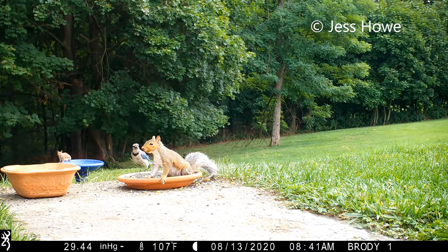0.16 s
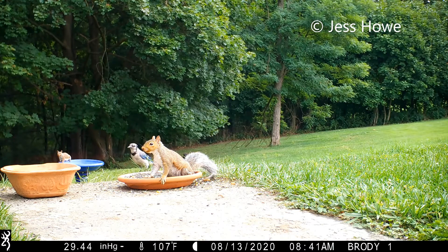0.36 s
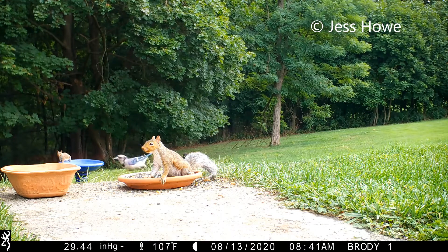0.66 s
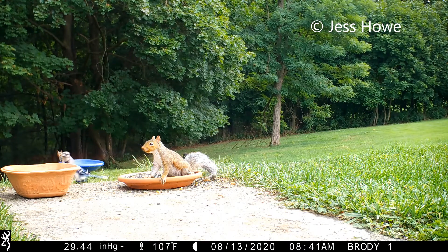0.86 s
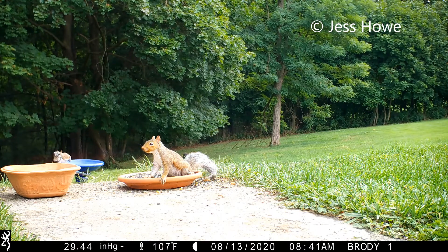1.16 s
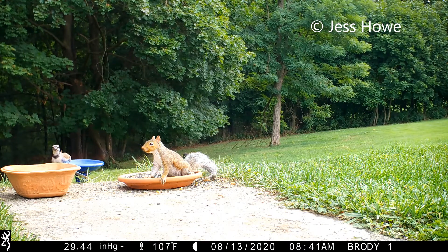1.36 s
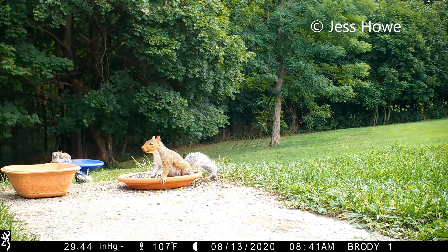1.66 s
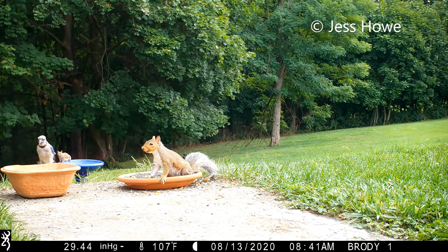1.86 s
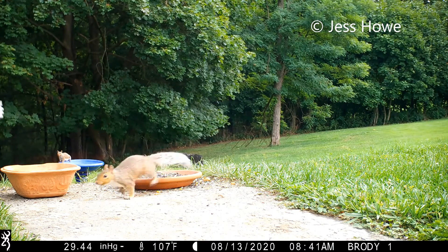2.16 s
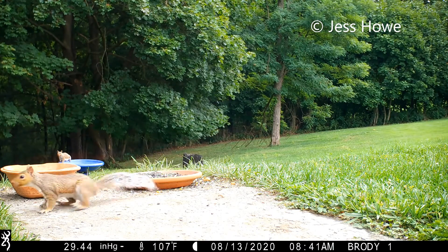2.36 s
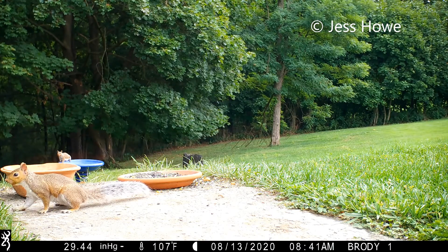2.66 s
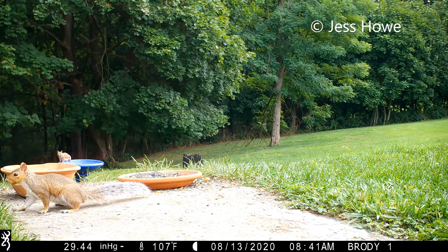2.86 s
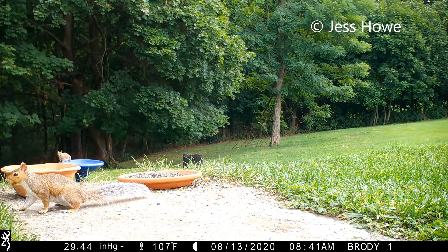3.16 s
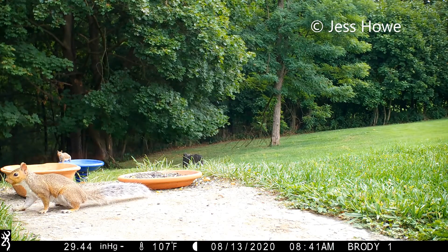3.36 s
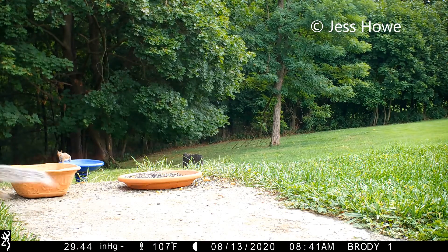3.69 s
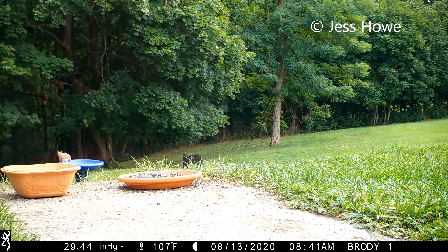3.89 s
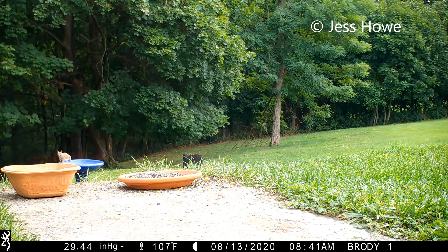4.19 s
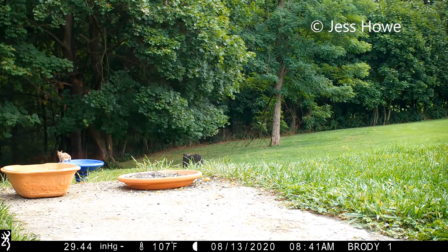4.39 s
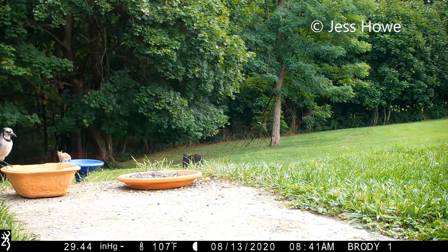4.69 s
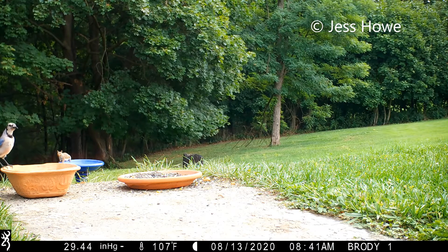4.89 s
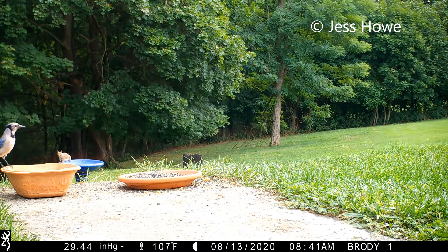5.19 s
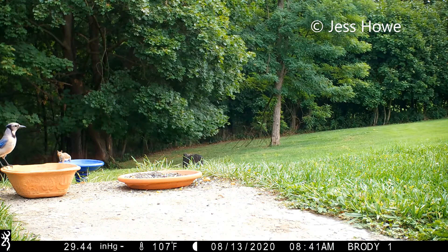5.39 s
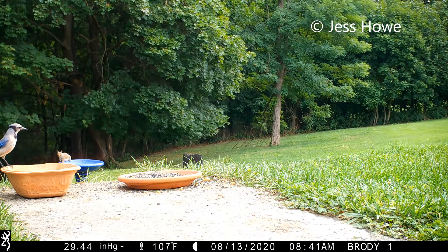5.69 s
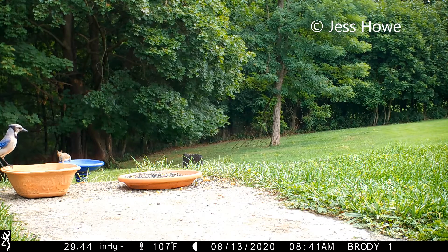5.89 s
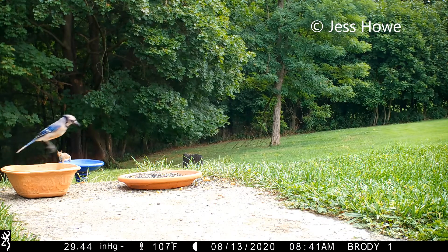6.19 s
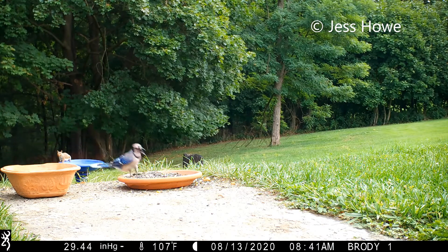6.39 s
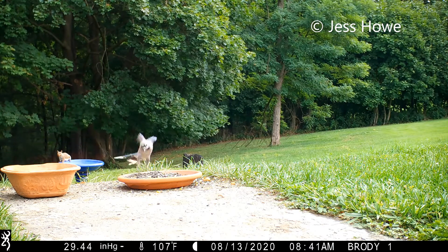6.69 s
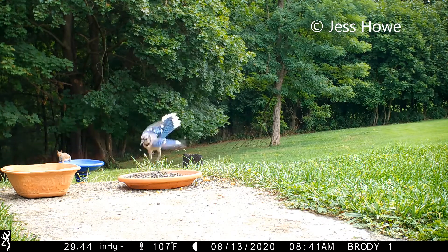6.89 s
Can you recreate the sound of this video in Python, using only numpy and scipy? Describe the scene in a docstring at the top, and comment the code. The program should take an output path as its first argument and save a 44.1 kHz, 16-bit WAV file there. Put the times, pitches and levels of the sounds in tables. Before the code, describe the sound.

A quiet garden beside woods, heard through a cheap camera microphone with a very faint high whine. The tail of a loud jay scream opens, then wingbeats, light paw scuffs and a tiny squeak. Two more piercing, raspy screams come about three seconds apart, crackling with overload and echoing off the trees. Far-off sweet descending whistles continue between them, and slight wing rustles surround the last call.

```python
"""In a garden, by a feeding dish, a blue jay gives three loud jeers close to a trail camera.
Each jeer is a harmonic stack that scoops up to a crest, sags, flutters fast and plunges; sparse decaying
echoes from the edge of the wood follow. Far off a small bird repeats a falling four-note song of sliding sines.
Wings and paws rustle as shaped noise over a soft hush, and the camera whines as a phase-flipping tone.
Its microphone overloads: peaks are rounded, with crackle, buzz and a shrill third harmonic."""
import sys
import numpy as np
from scipy import signal
from scipy.fft import rfft, irfft, next_fast_len
from scipy.io import wavfile
from scipy.ndimage import uniform_filter1d

SR = 44100
rng = np.random.default_rng(int(sys.argv[2]) if len(sys.argv) > 2 else 0)


def wav_out(sig):
    """Save sig, one row per channel (or a flat mono array), as 16-bit PCM at SR to the path in sys.argv[1]."""
    wavfile.write(sys.argv[1], SR, np.round(np.clip(np.atleast_2d(sig).T, -1, 1) * 32767).astype(np.int16))


N = 310904
T = np.arange(-SR // 4, N) / SR  # seconds; the first jeer is already under way at time zero


def undb(db):
    """Decibels to gain."""
    return 10 ** (np.asarray(db) / 20)


def unit(x):
    """Scale to rms 1."""
    return x / np.sqrt(np.mean(x ** 2))


def walk(rate_hz):
    """Random levels, each held for 1 / rate_hz, smoothed by two moving averages; rms 1."""
    hold = max(int(SR / rate_hz), 1)
    levels = rng.standard_normal(len(T))[:len(T) // hold + 1]
    held = np.repeat(levels, hold)
    slewed = uniform_filter1d(uniform_filter1d(held, hold), hold)
    return unit(slewed[:len(T)])


def tint(x, colour):
    """Filter with a response of (Hz, dB) points, joined on a log frequency axis."""
    hz, db = np.transpose(colour)
    size = next_fast_len(len(x))
    bins_hz = np.maximum(np.fft.rfftfreq(size, 1 / SR), 1)
    gain = undb(np.interp(np.log(bins_hz), np.log(hz), db))
    return irfft(rfft(x, size) * gain, size)[:len(x)]


def noise(colour):
    """Noise of rms 1 with a given colour."""
    return unit(tint(rng.standard_normal(len(T)), colour))


def swell(centre_s, length_s):
    """Gaussian rise and fall, length_s wide between its 1/e points."""
    return np.exp(-np.minimum((2 * (T - centre_s) / length_s) ** 2, 50))


def garden(hush_db=-51, rumble_db=-78):
    """Distant outdoor hush with a slowly shifting rumble, both coloured noise."""
    # Each row: frequency in Hz, relative density in dB.
    hush_colour = [(25, -26.5), (61, -10), (140, -3), (300, -1.5), (550, -4), (950, -3.5), (1680, -8),
                   (3000, -17), (4000, -26), (5000, -32), (7000, -35), (9000, -48), (11000, -47.5),
                   (15500, -48.5)]
    rumble_colour = [(60, -20), (140, -1.0), (290, 7.0), (500, -16), (1200, -29)]
    hush = noise(hush_colour) * undb(hush_db + 0.9 * walk(8.5))
    rumble = noise(rumble_colour) * undb(rumble_db + 0.73 * walk(0.86))
    return hush + rumble


def whine(tone_hz=7797, level_db=-75):
    """The camera's electronics: a thin tone that flips phase sixty times a second."""
    flips = np.pi / 2 * np.tanh(6 * np.sin(2 * np.pi * 30 * T))
    return np.sqrt(2) * undb(level_db) * np.sin(2 * np.pi * tone_hz * T + flips)


def lone_crackle(centre_s=3.42, length_s=0.015, level_db=-40.5):
    """One lone low crackle of the overloaded microphone: a short swell of dark noise."""
    colour = [(30, 5.0), (120, 0.5), (300, -22), (1000, -23), (8000, -39.0)]
    return undb(level_db) * swell(centre_s, length_s) * noise(colour)


def bursts(table, colour, grain_db):
    """Brief swishes of noise whose level jitters into grains."""
    swells = sum(undb(db) * swell(s, length_s) for s, length_s, db in table)
    return noise(colour) * undb(grain_db * walk(570)) * swells


def flurry(depth=0.23, grain_db=3):
    """Low puffs of air, one to each wing beat, that swell and die away."""
    # Each row: frequency in Hz, relative density in dB.
    puff_colour = [(40, -36.5), (150, -12), (290, 5.5), (420, -11), (700, -42), (8000, -75)]
    centre_s, length_s, level_db, wingbeat_hz = 1.675, 0.31, -48, 17.2
    beats = 1 - depth + depth * np.cos(2 * np.pi * wingbeat_hz * (T - centre_s))
    puffs = noise(puff_colour) * undb(level_db + grain_db * walk(400))
    return puffs * beats * swell(centre_s, length_s)


def movement(squeak_s=2.128):
    """Wings and paws around the dish as noise bursts, and a tiny sine squeak."""
    # Wing beats and scampering paws. Each row: centre in seconds, length in seconds, level in dB before grain.
    rustles = [(2.034, 0.035, -44.5), (2.103, 0.036, -53), (2.135, 0.082, -51.5), (2.231, 0.02, -52.5),
               (2.33, 0.049, -55.5), (2.42, .07, -58), (6.19, 0.028, -54), (6.88, .03, -58),
               (7.005, 0.054, -48)]
    # Each row: frequency in Hz, relative density in dB.
    rustle_colour = [(200, 3), (600, 0.5), (1500, 4.5), (2000, 4.5), (2300, 11.5), (2600, 4), (3000, 3.5),
                     (3450, -5), (3850, -1.5), (4600, -15.5), (9000, -31), (15000, -40)]
    squeak = undb(-62) * swell(squeak_s, 0.037) * np.sin(2 * np.pi * 4150 * T)
    return bursts(rustles, rustle_colour, grain_db=3.0) + flurry() + squeak


def woods(x, t60_s, first_s):
    """Sparse decaying echoes from trunks and leaves, convolved with the sound."""
    # Each row: frequency in Hz, gain in dB.
    echo_colour = [(500, -7.5), (1600, -3.5), (2600, -0.5), (3300, -1), (4200, 5), (5500, -5), (6600, 3),
                   (7600, -2), (9000, -3.5), (12000, -11.5)]
    t = np.arange(SR) / SR
    decay = np.exp(-np.log(1000) * t / t60_s)
    echoes = rng.standard_normal(SR) ** 3 * decay * (t > first_s)  # cubing makes strong echoes rare
    response = tint(echoes / np.linalg.norm(echoes), echo_colour)
    return signal.fftconvolve(x, response)[:len(x)]


def whistlers(waver=0.0061, direct_db=2, echo_db=4):
    """Pure notes that slide and settle, blurred by the trees."""
    # Two falling pairs of notes, high then low. Each row: delay in seconds and length in seconds
    # (both before stretch), fall as a share of the pitch, relative level in dB.
    song = [(0, .17, .085, -64.5), (0.142, .11, .06, -68.5), (0.202, 0.145, 0.0356, -58.5),
            (0.361, 0.114, 0.023, -55)]
    # Each row: start in seconds, time stretch, first pitch of the high pair in Hz, of the low pair in Hz,
    # added level of the high pair in dB, of the low pair in dB.
    phrases = [(0, 0.98, 3750, 2760, -4, 2.5), (.35, 1.06, 3737, 2623, -1, -2),
               (.98, 0.83, 3726, 2820, -3.5, -2), (3.56, 0.85, 3480, 2690, 2, -0.5),
               (3.955, 1.1, 3260, 2840, 2.5, -15), (5.557, .98, 3737, 2760, -1, 1),
               (5.981, 1.04, 3820, 2723, -5, 1.5)]
    # Single notes outside the phrase pattern, among them the last low note of the 3.955 s phrase.
    # Each row: start in seconds, length in seconds, final pitch in Hz,
    # fall as a share of the pitch (negative rises), relative level in dB.
    single_notes = [(0.451, .17, 1482, -0.16, -57.5), (1.16, .08, 1690, 0.021, -62),
                    (1.401, .073, 2156, 0.063, -56.5), (2.63, 0.046, 1690, 0.012, -59.5),
                    (4.34, 0.036, 2236, -0.023, -55), (6.211, 0.15, 3770, 0.055, -67.5)]
    high_step, low_step = 1.14, 1.28  # pitch ratio within each pair
    notes = list(single_notes)
    for s, stretch, high_hz, low_hz, high_db, low_db in phrases:
        tune = [(high_hz, high_db), (high_hz / high_step, high_db),
                (low_hz, low_db), (low_hz / low_step, low_db)]
        for (hz, pair_db), (delay_s, length_s, fall, note_db) in zip(tune, song):
            notes.append((s + stretch * delay_s, stretch * length_s, hz, fall, pair_db + note_db))
    out, drift = np.zeros_like(T), 1 + waver * walk(120)
    for s, length_s, end_hz, fall, db in notes:
        on = (T >= s) & (T < s + length_s)
        u = (T[on] - s) / length_s
        hz = end_hz * (1 + fall * (1 - u) ** 1.5) * drift[on]
        tone = np.sin(2 * np.pi * np.cumsum(hz) / SR)
        out[on] += np.sqrt(2) * undb(db) * np.sqrt(np.sin(np.pi * u)) * tone
    return undb(direct_db) * out + undb(echo_db) * woods(out, t60_s=0.89, first_s=0.0062)


def pops(lower_hz=2050, upper_hz=4900, upper_db=-14, length_s=0.0014):
    """The syrinx pops once before the later two jeers: two throat tones under a very short swell."""
    # Each row: centre in seconds, level of the lower tone in dB.
    pop_rows = [(3.226, -24), (6.426, -17)]
    ring = np.sin(2 * np.pi * lower_hz * T) + undb(upper_db) * np.sin(2 * np.pi * upper_hz * T)
    return ring * sum(undb(db) * swell(s, length_s) for s, db in pop_rows)


def gesture(t, start_s, end_s, others_db, held):
    """The course of one jeer: pitch, level of the favoured harmonic and of the others, flutter depth."""
    scoop_depth, scoop_s, plunge_depth, plunge_s = .39, .0115, .22, .0055  # depths are shares of the pitch
    # the favoured harmonic starts less far down than the rest, which catch up a little later;
    # all fade in the plunge
    swell_db, swell_s, onset_db, onset_s = -6.5, .016, -14, .011
    release_db, release_s = -17.5, 0.0036
    flutter_s = 0.12  # time constant of the flutter's build-up towards the end
    since, left = np.maximum(t - start_s, 0), np.maximum(end_s - t, 0)
    s, *columns = np.transpose(held)
    hz, db = (np.interp(t, s, column) for column in columns)
    scoop = scoop_depth * np.exp(-(since / scoop_s) ** 2)
    plunge = plunge_depth * np.exp(-left / plunge_s)
    release = release_db * np.exp(-left / release_s)
    favoured_db = db + swell_db * np.exp(-(since / swell_s) ** 2) + release
    lesser_db = others_db + onset_db * np.exp(-since / onset_s) + release
    return hz * (1 - scoop - plunge), favoured_db, lesser_db, np.exp(-left / flutter_s)


def jeer(row, held, harmonics, bend=.021, quaver_db=0.15, waver_db=2.5, jitter=0.0032,
         edge_s=0.0025, attack_s=0.018, attack_db=-12, throat_pitch_hz=825):
    """A harmonic stack; the second side of the syrinx shakes its pitch and loudness."""
    # Each row: frequency in Hz, relative density in dB.
    rasp_colour = [(800, -35.5), (2100, 8), (3000, -2), (4200, 3.5), (5200, -4.5), (6600, -6), (7500, -23),
                   (10000, -22.5), (15000, -37.5)]
    start_s, end_s, others_db, flutter_hz, throb, rough, rasp_db, squeal_db = row
    on = (T > start_s - edge_s) & (T < end_s + edge_s)
    t = T[on]
    hz, db, lesser_db, flutter = gesture(t, start_s, end_s, others_db, held)

    shake = 2 * np.pi * np.cumsum(flutter_hz * (1 + 0.053 * walk(90)[on])) / SR
    roughness = (jitter + rough * flutter ** 2) * walk(900)[on]
    wobble = bend * flutter * np.sin(shake) + roughness
    phase = 2 * np.pi * np.cumsum(hz * (1 + wobble)) / SR

    # brassiness sets every harmonic but the favoured one, and each of them wavers on its own
    numbers, levels = np.transpose(harmonics)
    strongest, favoured = max(levels), np.argmax(levels) + 1
    brass_db = lesser_db - db
    # at the crest the upper harmonics climb out of the throat's resonance
    climb = np.maximum(hz / throat_pitch_hz, 1)
    voice = np.zeros_like(t)
    for k, level in enumerate(levels, 1):
        harmonic_db = np.interp(k * climb if k > favoured else k, numbers, levels)
        if level < strongest:
            harmonic_db = harmonic_db + brass_db + waver_db * walk(35)[on]
        voice += undb(harmonic_db) * np.sin(k * phase)

    # air rasps and the sixth harmonic squeals in the scoop; air rasps again in deep flutter
    scoop = np.exp(-((t - start_s) / attack_s) ** 2)
    voice += undb(squeal_db) * scoop * np.sin(6 * phase)
    rasp = noise(rasp_colour)[on] * (undb(attack_db) * scoop + undb(rasp_db) * flutter ** 3)

    gate = np.clip(np.minimum(t - start_s, end_s - t) / edge_s + 1, 0, 1)
    loudness = undb(db + quaver_db * walk(170)[on]) * (1 - throb * flutter * np.sin(shake + 1))
    out = np.zeros_like(T)
    out[on] = (np.sqrt(2) * voice + rasp) * gate * loudness
    return out


def scene():
    """The jay close by, its echo, the garden behind and the camera's own noises."""
    # Each row: start in seconds, end in seconds, level of the lesser harmonics in dB, mean flutter in Hz,
    # throb 0-1, roughness as a share of the pitch, rasp, squeal and echo in dB relative to the call.
    jeers = [(-.23, 0.072, -8, 134.4, 0.25, 0.0056, -21.5, -24, -19.5),
             (3.231, 3.564, -13.5, 160, 0.06, 0.011, -21.5, -7, -13),
             (6.431, 6.732, -7, 155.3, 0.1, .007, -22.5, -29, -22)]
    # The held part, sagging from its crest. Each row: time in seconds, pitch in Hz before scoop and plunge,
    # level in dB before swell and release.
    held_1 = [(-.2, 890, -13), (-.1, 831, -8), (0, 808, -10.5), (.03, 797, -11), (.06, 762.5, -11)]
    held_2 = [(3.255, 890, -19.5), (3.269, 888.4, -13.5), (3.305, 875.4, -17), (3.339, 852.2, -11),
              (3.385, 847.6, -13.5), (3.413, 824.7, -9), (3.501, 819, -11.5), (3.535, 791.7, -13),
              (3.548, 783, -12.5)]
    held_3 = [(6.455, 872, -13), (6.473, 893.6, -8), (6.555, 833.3, -8), (6.665, 823.8, -7.5),
              (6.703, 797.4, -8), (6.718, 778, -8.5)]
    # The voice changes as the bird turns; the throat favours the fourth harmonic.
    # Each row: harmonic number, relative level in dB.
    voice_1 = [(1, -30), (2, -15), (3, -14), (4, 1), (5, -23), (6, -43), (7, -40.5), (8, -36.5), (9, -47),
               (10, -51.5)]
    voice_2 = [(1, -41), (2, -22), (3, -15.5), (4, -3), (5, -29), (6, -31.5), (7, -35), (8, -34), (9, -44),
               (10, -52.5), (11, -47.5), (12, -54.5), (13, -60.5), (14, -59), (15, -61.5), (16, -66),
               (17, -62), (18, -64)]
    voice_3 = [(1, -32), (2, -21), (3, -16), (4, 0.5), (5, -22), (6, -43.5), (7, -47), (8, -45), (9, -48),
               (10, -53), (11, -41.5)]
    jay, thrown = pops(), 0
    for (*row, echo_db), held, voice in zip(jeers, (held_1, held_2, held_3), (voice_1, voice_2, voice_3)):
        call = jeer(row, held, voice)
        jay = jay + call
        thrown = thrown + undb(echo_db) * call  # the more the bird faces the trees, the more they throw back
    echo = woods(thrown, t60_s=0.67, first_s=0.002)
    mix = jay + echo + whistlers() + movement() + lone_crackle() + garden() + whine()
    return mix[None, -N:]


def record(dry, ceiling=0.89, knee=16.0, overload=0.43, crackle_db=-15, buzz_db=-14, shrill_db=-4,
           softness=0.035, top_hz=15750):
    """The microphone rounds loud peaks, crackles, buzzes and shrills while overloaded; the top is cut."""
    # Each row: frequency in Hz, relative density in dB.
    crackle_colour = [(25, 0.5), (70, -6), (130, -3), (400, -4.5), (950, -5.5), (1500, -11.5),
                      (3500, -13.5), (5000, -25), (8000, -34.5), (12000, -31), (15500, -24)]
    x = dry[0]
    envelope = np.sqrt(2 * np.abs(uniform_filter1d(x ** 2, size=64)))
    excess = softness * np.logaddexp(0, (envelope - overload) / softness)  # overload sets in gradually
    sustained = uniform_filter1d(excess, size=500)
    crackle = undb(crackle_db) * excess * noise(crackle_colour)[-N:]
    # lopsided overload turns the flutter of a loud call into a low buzz
    buzz = undb(buzz_db) * (excess - sustained)
    third_harmonic = -np.cos(3 * np.angle(signal.hilbert(x)))
    shrill = undb(shrill_db) * sustained ** 2 * third_harmonic  # strongest under sustained overload
    rounded = x / (1 + np.abs(x / ceiling) ** knee) ** (1 / knee)
    low_pass = signal.ellip(10, .2, 80, top_hz, fs=SR, output="sos")
    return signal.sosfilt(low_pass, rounded + crackle + buzz + shrill)[None]


dry = scene()
out = record(dry)
wav_out(out)
```